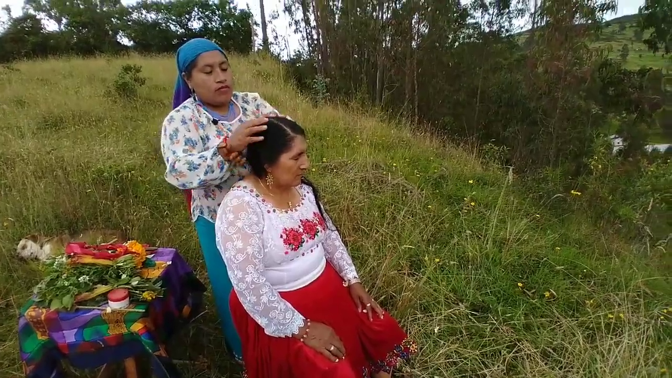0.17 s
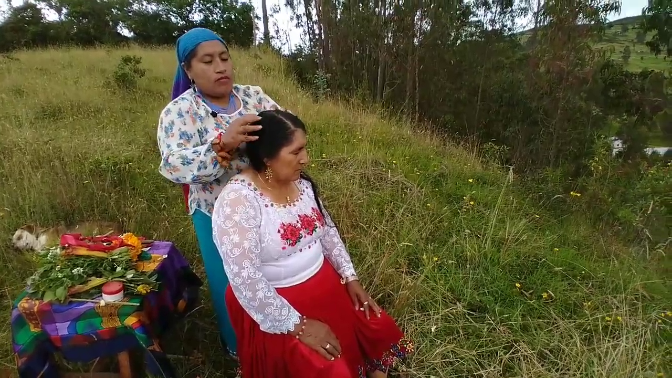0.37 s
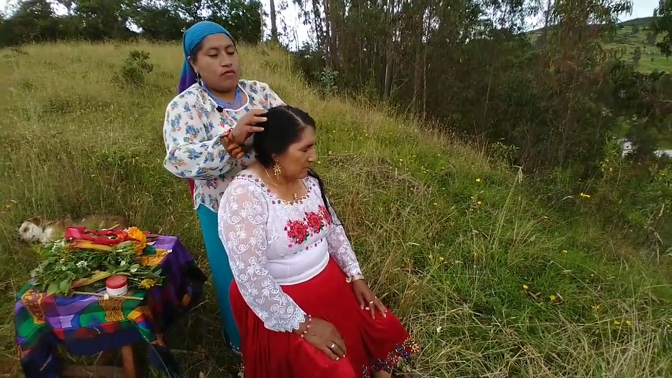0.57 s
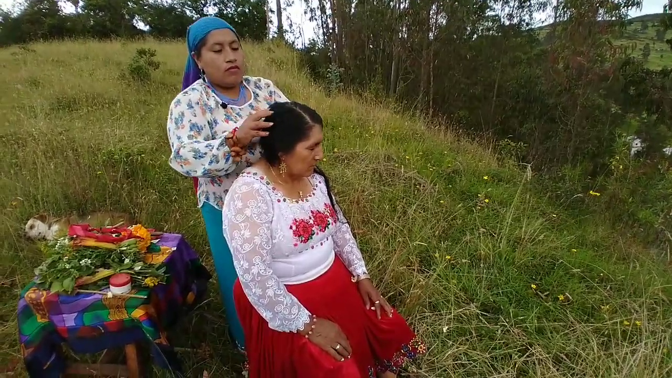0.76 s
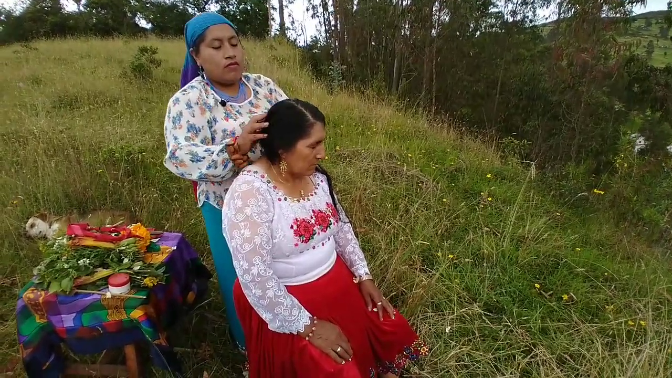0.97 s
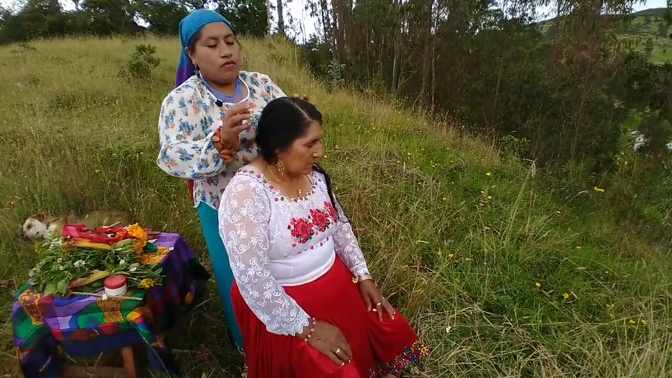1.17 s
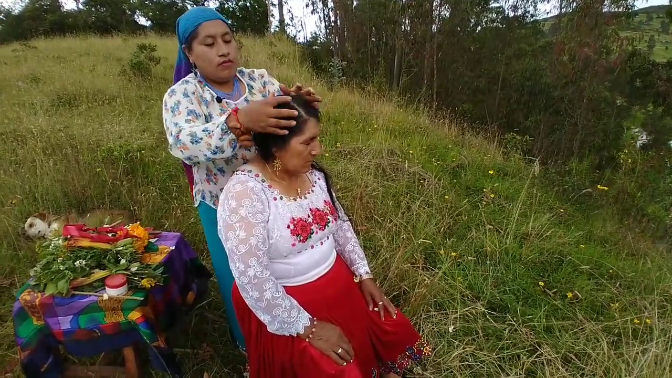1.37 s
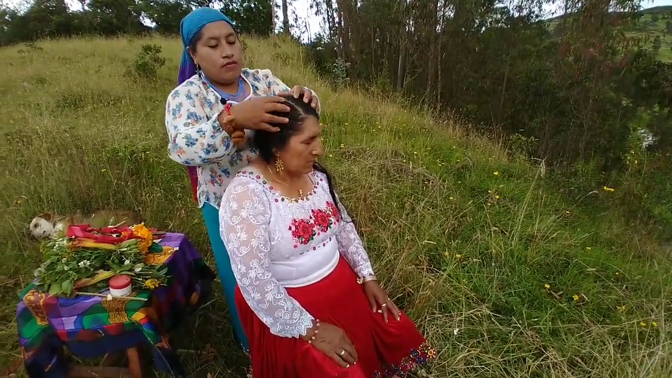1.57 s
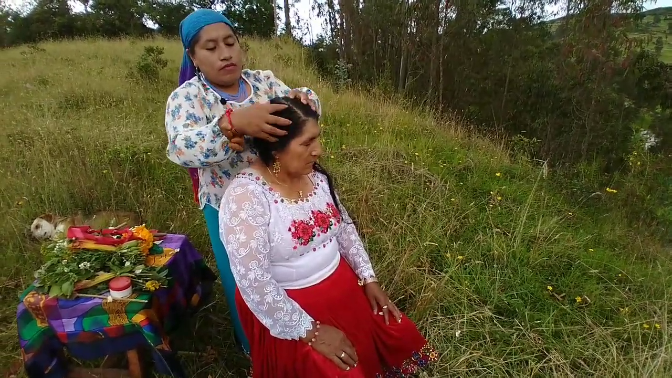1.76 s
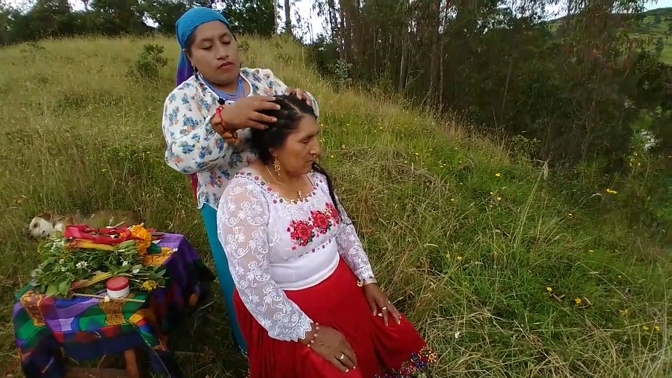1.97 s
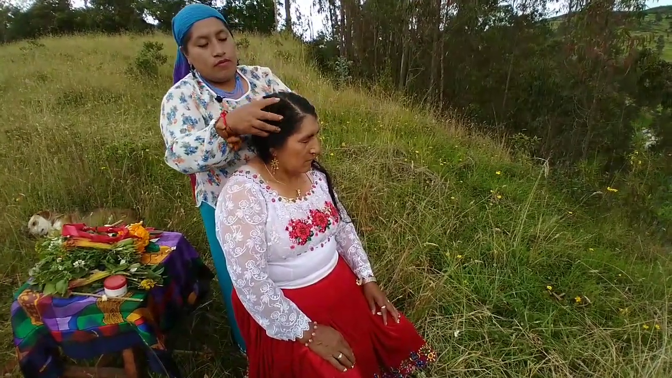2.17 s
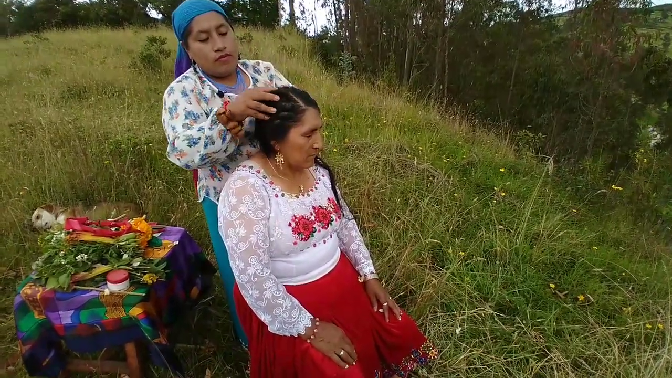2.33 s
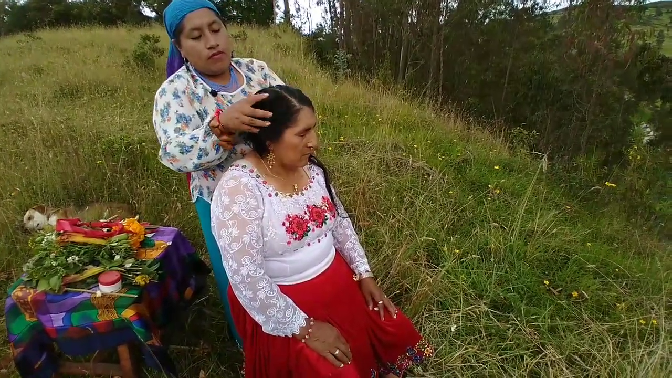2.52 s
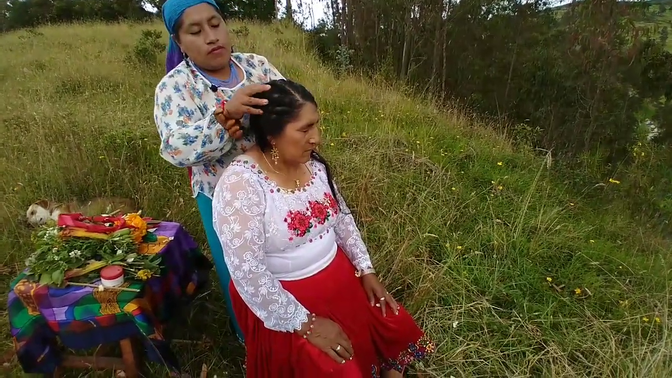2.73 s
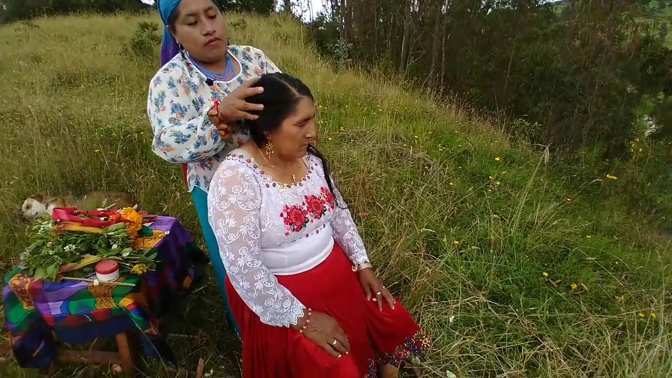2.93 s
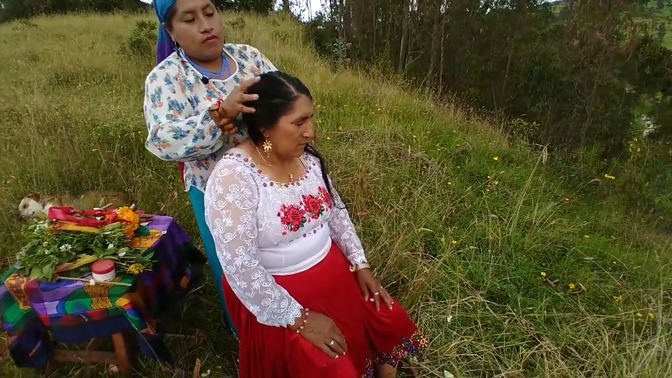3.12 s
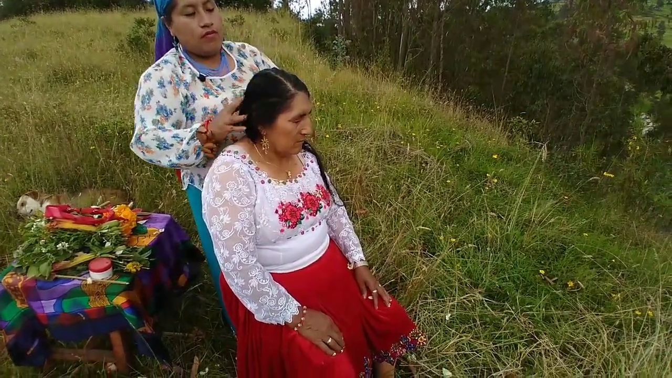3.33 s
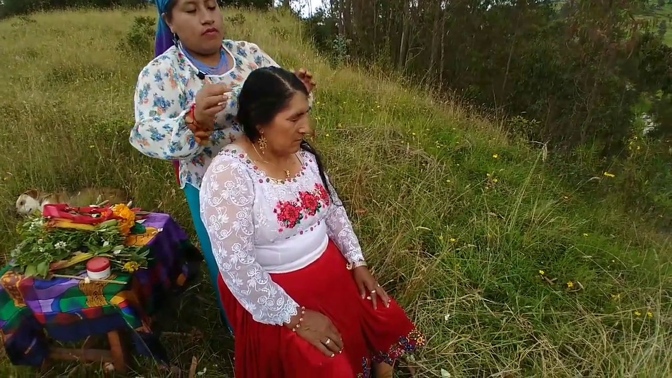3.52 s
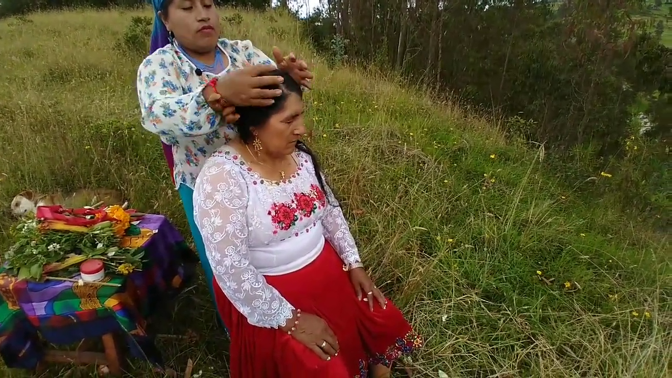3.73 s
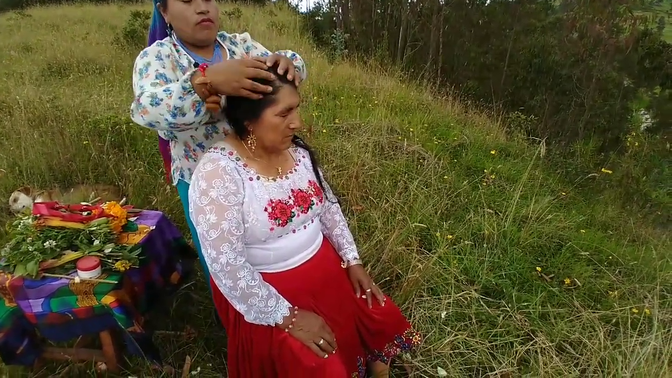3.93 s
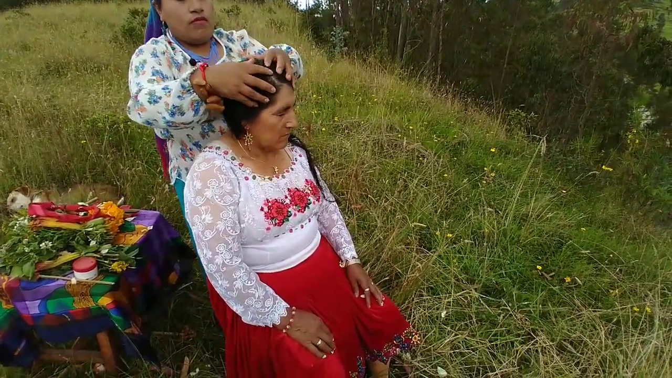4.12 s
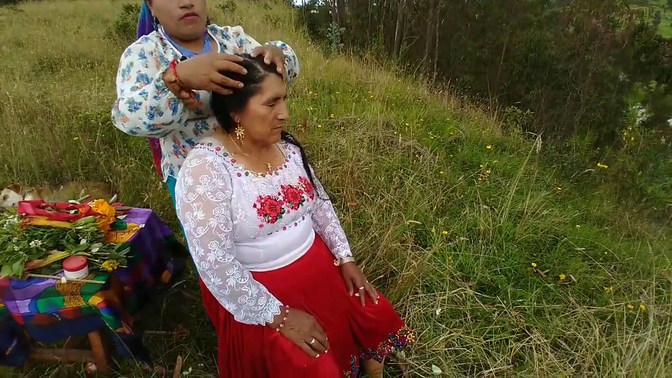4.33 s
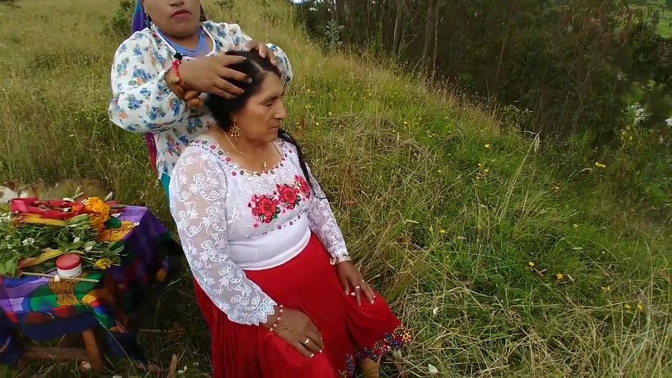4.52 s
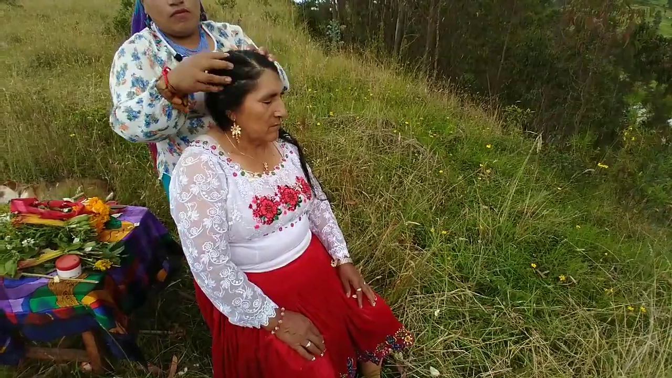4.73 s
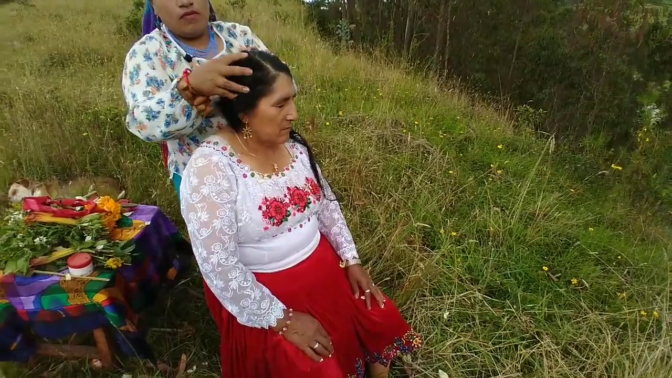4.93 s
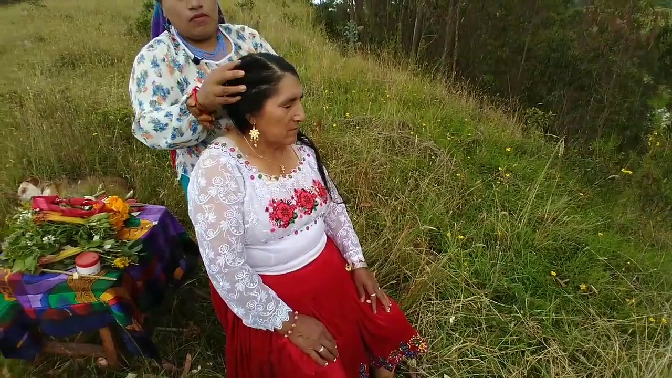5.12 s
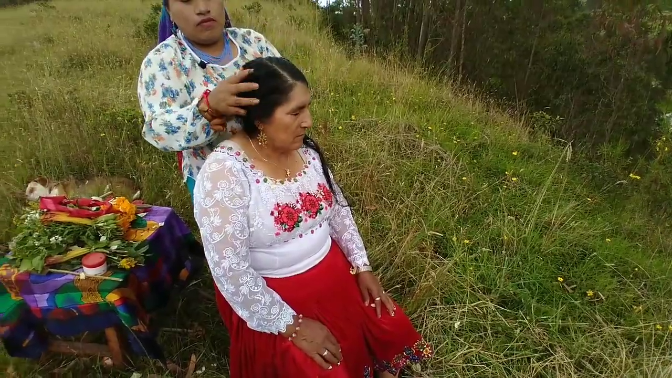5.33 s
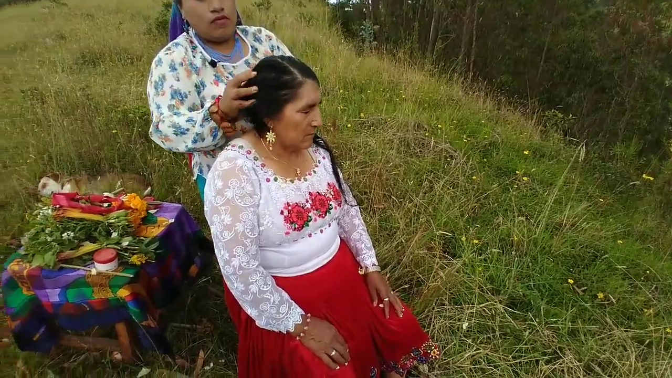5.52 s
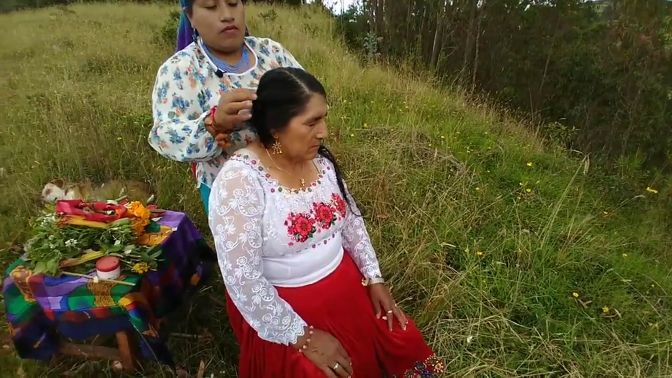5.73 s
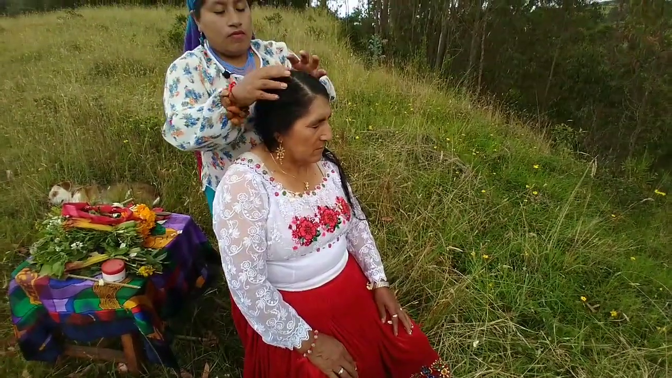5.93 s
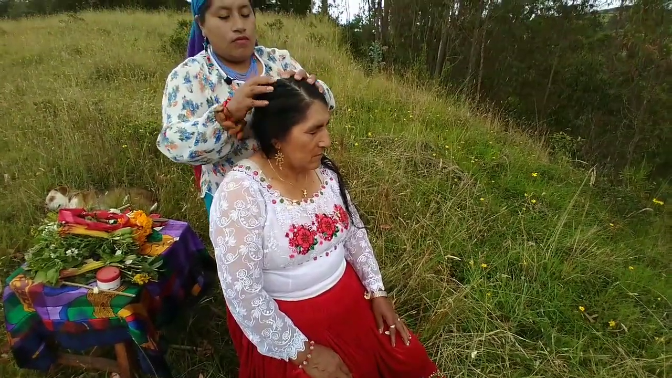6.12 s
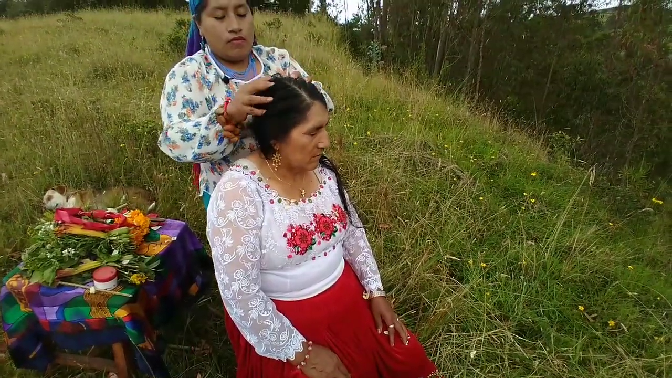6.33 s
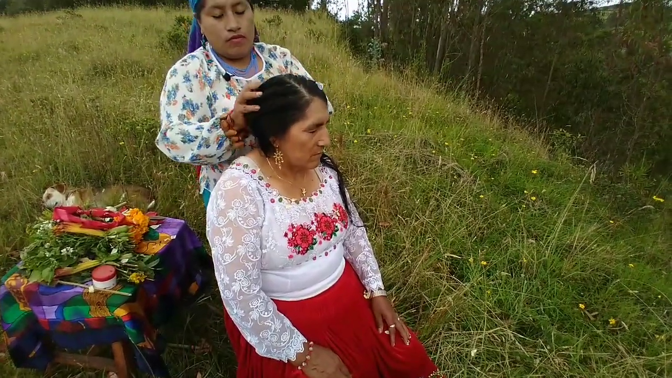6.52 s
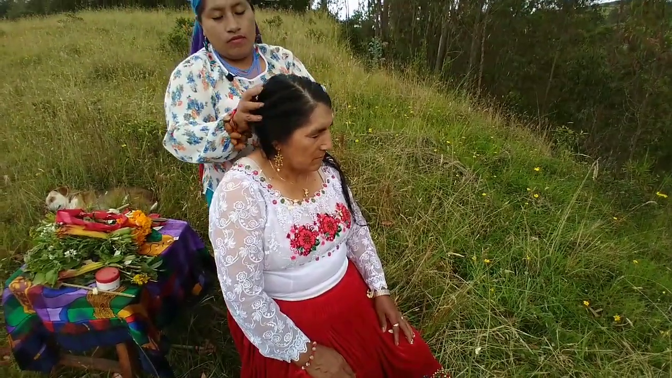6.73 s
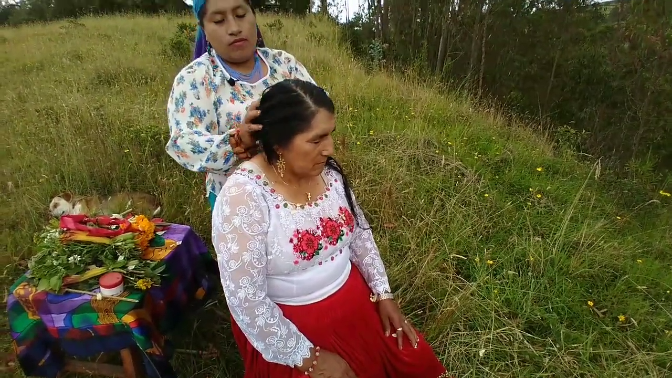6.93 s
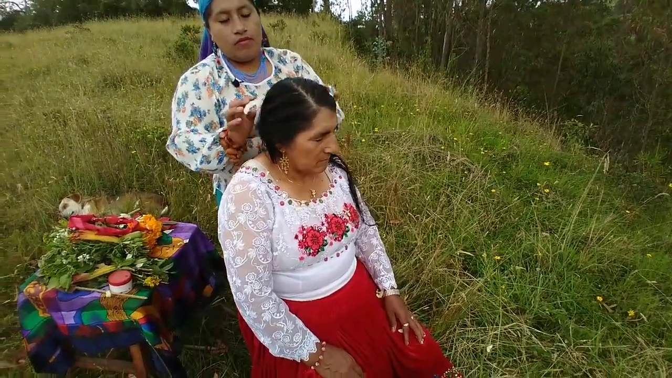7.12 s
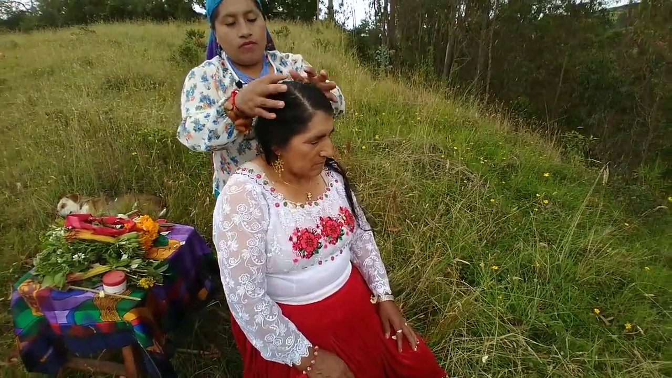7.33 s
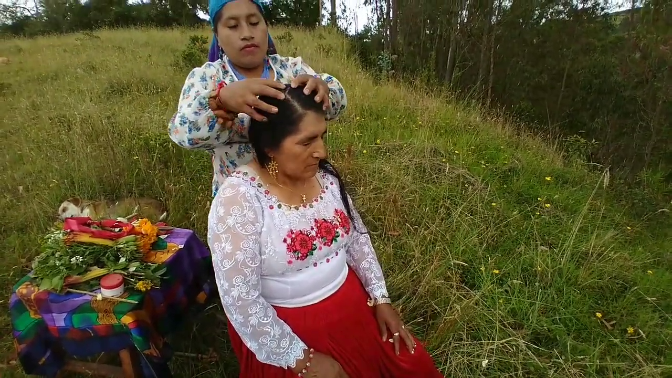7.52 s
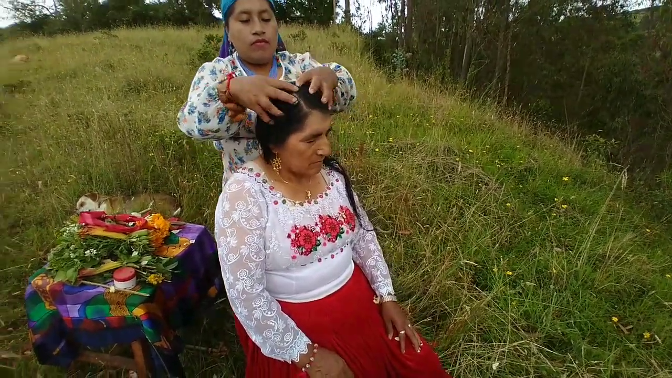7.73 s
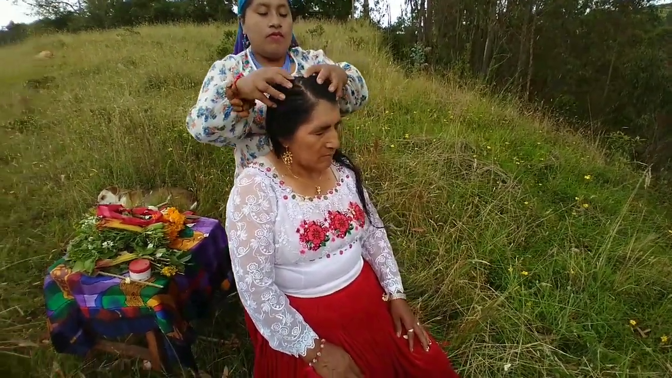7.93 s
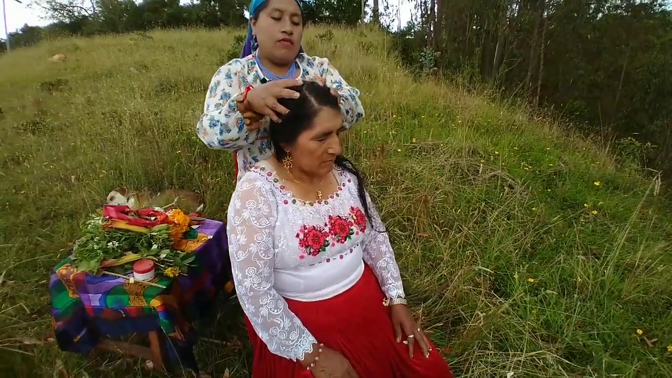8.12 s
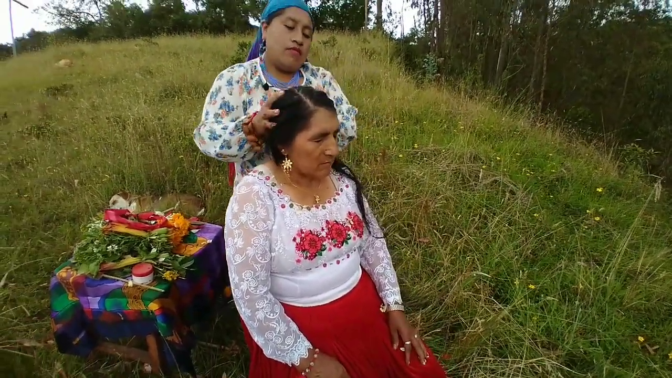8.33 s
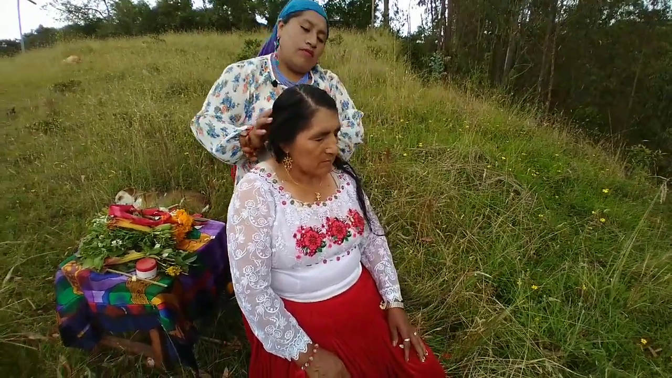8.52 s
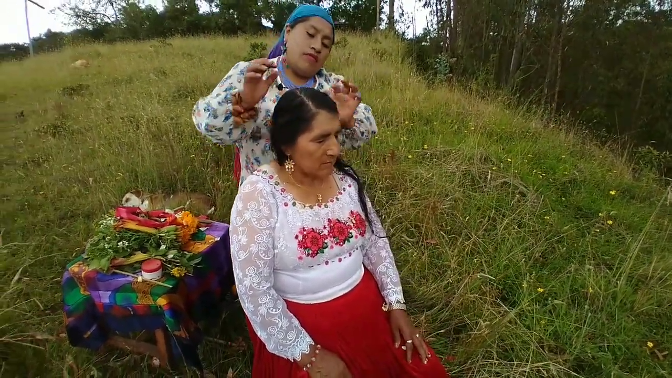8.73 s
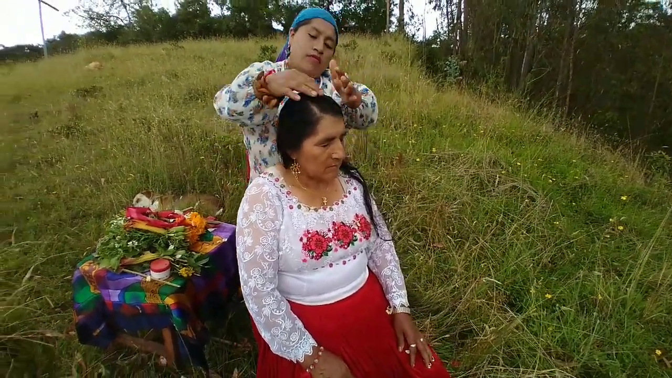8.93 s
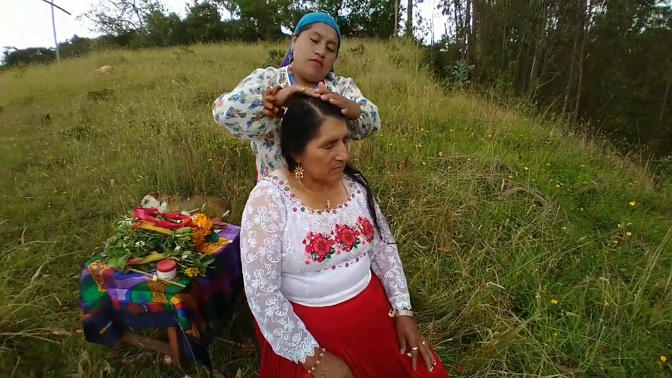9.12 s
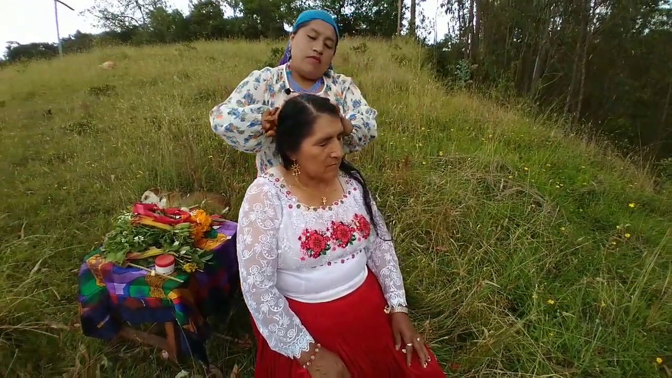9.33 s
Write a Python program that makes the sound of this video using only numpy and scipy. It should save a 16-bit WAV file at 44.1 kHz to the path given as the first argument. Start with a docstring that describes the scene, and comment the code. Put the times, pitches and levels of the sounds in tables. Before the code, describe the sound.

A scalp is scratched outdoors, heard very near and slightly to the right. Quick firm strokes crackle with many tiny ticks of slipping hair, joined by dry nail rasp and sharp snaps. Between them light brushing continues with only tiny gaps. Behind is quiet open air, deep rumble, faint hiss and a distant low hum, with no room echo.

```python
"""Fingers brush lightly through hair and scratch the scalp in firm strokes all along, on a quiet hillside.
Each stroke makes many hairs slip: random ticks ring in narrow bands and merge into a crackle.
Thin chirps of narrow noise, sharp snaps that ring, a dry rasp of nails and ticks of loose hairs join in.
Behind lie shaped noise as open air, a wavering sine as a far drone, and faint tones of narrow noise.
A small two-port microphone close by hears the hands with a slight delay on the left."""
import sys
import numpy as np
from scipy import signal
from scipy.fft import rfft, irfft
from scipy.io import wavfile
from scipy.ndimage import uniform_filter1d, map_coordinates

SR = 44100
rng = np.random.default_rng(int(sys.argv[2]) if len(sys.argv) > 2 else 0)


def pcm_store(signal):
    """Save signal as 16-bit PCM."""
    levels = np.round(np.clip(np.atleast_2d(signal), -1, 1) * 32767)
    wavfile.write(sys.argv[1], SR, levels.astype(np.int16).T)


N = 413658

# a finger digs in and scratches: (start t/s, length/s, relative level/dB, ring f/Hz)
SCRATCH_STROKES = [(0.19, 0.11, -22, 3190), (0.314, 0.067, -16, 3100), (0.517, 0.14, -27.5, 2950),
                   (0.697, 0.11, -22.5, 3070), (0.896, 0.122, -26, 2600), (1.052, 0.046, -19.5, 3080),
                   (1.402, 0.024, -31, 3080), (1.565, 0.15, -31, 3080), (1.878, 0.023, -30.5, 2760),
                   (1.94, 0.016, -28, 2610), (2.065, 0.023, -21.5, 3220), (2.208, 0.085, -31, 2880),
                   (2.369, 0.032, -31, 2830), (2.495, 0.0143, -36, 2580), (2.841, 0.057, -29.5, 3350),
                   (2.931, 0.048, -32, 2980), (3.146, 0.05, -30, 2900), (3.268, 0.075, -31.5, 2930),
                   (3.452, 0.13, -27.5, 2800), (3.786, 0.013, -33.5, 2670), (3.842, 0.093, -31, 2450),
                   (3.985, 0.039, -36.5, 3220), (4.216, 0.066, -31.5, 2320), (4.389, 0.046, -20.5, 3000),
                   (4.477, 0.14, -33, 3050), (4.662, 0.0099, -28.5, 2730), (4.729, 0.04, -27, 2960),
                   (4.773, 0.02, -17, 2950), (4.883, 0.048, -32.5, 2980), (5.091, 0.2, -32.5, 2550),
                   (5.581, 0.042, -28, 3160), (5.665, 0.014, -30, 2770), (5.809, 0.032, -23, 2920),
                   (6.07, 0.071, -17.5, 3000), (6.169, 0.062, -22.5, 3400), (6.21, 0.052, -16, 3150),
                   (6.291, 0.01, -21, 2720), (6.408, 0.032, -28.5, 3000), (6.459, 0.069, -25.5, 2700),
                   (6.58, 0.11, -24, 2830), (6.862, 0.15, -29.5, 2730), (7.044, 0.03, -21, 2540),
                   (7.13, 0.039, -20.5, 3300), (7.215, 0.054, -32, 2520), (7.401, 0.044, -32.5, 2900),
                   (7.593, 0.06, -18.5, 3200), (7.776, 0.035, -32, 2650), (7.857, 0.036, -26.5, 2520),
                   (7.957, 0.08, -24.5, 3150), (8.126, 0.056, -30, 3100), (8.263, 0.067, -30.5, 2630),
                   (8.363, 0.058, -28.5, 2520), (8.537, 0.076, -30.5, 2450), (8.681, 0.059, -30.5, 2570),
                   (8.927, 0.0088, -26, 2400), (8.952, 0.066, -17, 2760), (9.064, 0.099, -20, 3180),
                   (9.137, 0.16, -31.5, 2900)]
# the hands brush lightly through the hair: (start t/s, end t/s, relative level/dB)
BRUSH_PASSES = [(0, 1.151, -37), (1.381, 2.502, -41.5), (2.648, 3.046, -44), (3.157, 3.71, -39.5),
                (3.759, 4.976, -44), (5.012, 5.335, -42.5), (5.536, 6.303, -40.5), (6.389, 7.282, -38),
                (7.387, 8.057, -43), (8.103, 9.303, -41.5)]
# a nail lets go of a strand: (t/s, relative peak level/dB, ring f/Hz)
STRAND_SNAPS = [(0.3085, -8, 2760), (0.3244, -3.5, 3020), (0.575, -14.5, 3220), (0.7081, -4, 3050),
                (0.7863, 0.5, 3020), (0.9307, -4.5, 2580), (1.601, -5, 3700), (2.042, -17, 3440),
                (2.0713, -4, 3220), (3.437, -19, 2820), (3.506, -19, 2850), (3.8867, -12.5, 3100),
                (3.9285, -13, 3000), (4.386, -8.5, 3300), (5.1545, -13.5, 3240), (5.2436, -9, 3180),
                (5.81, -11.5, 3350), (6.0639, -12.5, 4160), (6.1874, -3.5, 4080), (6.233, 0.5, 3070),
                (6.4648, -9.5, 2580), (6.6439, -2.5, 3000), (7.6018, -41, 3080), (7.632, -8.5, 3510),
                (8.1534, -11, 3000), (8.3834, -15, 2490), (8.9977, -2.5, 2970), (9.0774, -7.5, 3300),
                (9.0941, -0.5, 3000), (9.128, -4, 3100), (9.2591, -12.5, 2630)]
# thin high chirps, short narrow bands of noise with a sharp start: (start t/s, relative level/dB, pitch f/Hz)
THIN_CHIRPS = [(1.496, -26, 3910), (1.599, -30, 3530), (1.83, -31, 3700), (2.04, -22.5, 3550),
               (2.244, -26, 3900), (3.845, -34, 3800), (4.116, -34.5, 3780), (4.538, -29, 3730),
               (4.583, -25, 3700), (6.02, -23.5, 3940), (6.185, -18, 3980), (6.567, -26.5, 4160),
               (6.886, -25, 4020), (8.958, -15, 3940)]
# tone colour of scratched hair: (f/Hz, relative level/dB)
HAIR_COLOUR = [(700, -25), (1400, -16.5), (1660, -5.5), (1830, -14), (2070, -6.5), (2750, 0.5),
               (3150, -7.5), (3450, -7.5), (3850, -11.5), (4500, -13), (5400, -21), (7000, -20.5),
               (9500, -30), (11500, -44.5), (15500, -70)]
# direction of the hands: (t/s, mean delay of the left port/s)
HAND_BEARING = [(0, 0.00018), (2.2, 0.00018), (3.6, 0.0002), (4.7, 0.00024), (6.0, 0.00018), (8.0, 0.00017),
                (9.4, 0.00012)]
# spectrum of outdoor rumble and hiss: (f/Hz, level/dB per Hz)
AIR_SPECTRUM = [(12, -47.5), (25, -58), (50, -61), (100, -63), (150, -69.5), (300, -73.5), (600, -81.5),
                (900, -84.5), (1300, -95), (1800, -103), (2800, -101), (5000, -108), (9000, -112),
                (15000, -114)]
# how alike the air is at both ports: (f/Hz, likeness from 0 to 1)
AIR_PORT_LIKENESS = [(25, 0), (60, 0.5), (200, 0.61), (450, 0.47), (900, 0), (8000, 0.27)]
# path of the far drone, before its random waver: (t/s, pitch f/Hz, peak level/dB)
DRONE_PATH = [(0, 101, -44.5), (1.7, 103, -48), (3.8, 94, -45.5), (4.3, 77, -53.5), (6.5, 76, -48.5),
              (9.38, 85, -46.5)]
# faint tones from far away: (middle t/s, length/s, level/dB, pitch f/Hz)
DISTANT_TONES = [(0.03, 0.12, -55.5, 972), (0.3, 0.68, -56.5, 825), (1.58, 0.19, -43.5, 162.3),
                 (2.2, 0.25, -58.5, 853), (4.26, 0.1, -54, 720), (4.7, 0.37, -60, 877),
                 (6.98, 0.17, -57.5, 897)]

ATTACK_S, RELEASE_S = 0.0052, 0.01   # how fast a finger bites and lets go
ARCH_DB = 2   # a stroke presses this much harder midway than at its ends
TOUCHES_PER_S, TOUCH_S, TOUCH_SPREAD_DB = 24, 0.018, 4   # fingertips catch briefly
GLIDE_DB = -7.0   # the steady rub beneath those touches
CHIRP_S = 0.018   # a chirp's strength falls to 1/e in this time
CUTOFF_HZ = 15600


def hand(brush_hz=2700):
    """Firm strokes add to the light brushing; the strongest contact weighs most in the ring pitch."""
    power = brushing() ** 2 + 1e-12
    weighted_hz = power * brush_hz
    for start, length, db, hz in SCRATCH_STROKES:
        press = contact(length)
        progress = np.minimum(np.arange(len(press)) / SR / length, 1)
        arch = np.sin(np.pi * progress)
        stroke_power = (press * from_db(db + ARCH_DB * (arch - 1))) ** 2
        add(power, stroke_power, start)
        add(weighted_hz, stroke_power * hz, start)
    return np.sqrt(power), weighted_hz / power


def contact(length):
    """A finger's pressure rises, holds until this many seconds after the start, then dies away."""
    t = np.arange(int((length + 10 * RELEASE_S) * SR)) / SR
    attack = np.minimum(t / ATTACK_S, 1)
    release = np.exp(-np.maximum(t - length, 0) / RELEASE_S)
    return attack * release


def brushing():
    """Fingertips glide and catch lightly for as long as the hands are in the hair."""
    in_hair, touches = np.zeros(N), np.zeros(N)
    for start, end, db in BRUSH_PASSES:
        add(in_hair, from_db(db) * contact(end - start), start)
    # each touch strays from an even beat and has its own strength
    for k, (late, strength) in enumerate(rng.uniform(-1, 1, size=(600, 2))):
        touch = from_db(TOUCH_SPREAD_DB * strength) * contact(TOUCH_S)
        add(touches, touch, (k + late / 2) / TOUCHES_PER_S)
    return in_hair * rms_one(from_db(GLIDE_DB) + touches)


def jerks(level_db=-1.0, size=1800):
    """The finger sticks and jerks on, which shares its force out unevenly within a stroke."""
    force = tufts(per_s=170, settle_s=0.0028, steady=1.0)
    # keep the power even over about 41 ms
    nearby_power = uniform_filter1d(force ** 2, size=size)
    return from_db(level_db) * force / np.sqrt(nearby_power + 1e-9)


def slips(per_s, spread_db):
    """Hairs slip free at random moments, with random sizes and directions; rms 1."""
    born = rng.random(N) < per_s / SR
    size_db = spread_db * np.minimum(rng.exponential(1, N), 3)
    return rms_one(born * from_db(size_db) * rng.choice([-1, 1], N))


def tufts(per_s=90, settle_s=.003, steady=.5):
    """Hairs give way in tufts: a sudden flurry that dies in a few milliseconds; rms 1."""
    starts = (rng.random(N) < per_s / SR) + 1e-18
    flurries = signal.lfilter([1], [1, -np.exp(-1 / (settle_s * SR))], starts)
    return rms_one(steady + rms_one(flurries))


def crackle(pressure, ring_hz, wander_octaves=0.16, slips_per_s=260, spread_db=2.5, level_db=-2.0, count=14):
    """Slipping strands ring briefly in many narrow bands; a firm stroke stirs a wider range of pitches."""
    centre_hz = ring_hz * 2 ** (wander_octaves * drift(35, N))
    reach_octaves = 0.3 + 0.22 * (pressure / pressure.max()) ** 0.16
    flurry = tufts(per_s=80, settle_s=.003, steady=.6)
    strands = np.zeros(N)
    for hz in np.geomspace(1600, 4300, count):
        octaves_away = np.log2(hz / centre_hz)
        near = np.exp(-.5 * (octaves_away / reach_octaves) ** 2)
        caught = from_db(4.16 * drift(45, N))
        ticks = slips(slips_per_s, spread_db) * near * caught * flurry
        strands += resonance(ticks, hz, width_hz=139)
    sound = through_hair(strands)
    # the finger's pressure, not the number of strands caught, sets the power
    power = np.maximum(uniform_filter1d(sound ** 2, size=700), 0)
    evened = sound / np.sqrt(power + 0.05 * np.mean(sound ** 2))
    return from_db(level_db) * pressure * evened


def snaps(burst_s=0.00061, settle_s=0.0037, tail_db=-15, ring_db=9, level_db=0.0, size=1024):
    """A caught strand lets go: a sharp burst of slips that rings, then its neighbours settle."""
    out, t = np.zeros(N), np.arange(size) / SR
    release = np.exp(-t / burst_s) + from_db(tail_db) * np.exp(-t / settle_s)
    for s, db, hz in STRAND_SNAPS:
        burst = through_hair(rng.standard_normal(size) * release)
        sound = burst + from_db(ring_db) * resonance(burst, hz, width_hz=560)
        sound = sound / np.abs(sound).max()
        # start just ahead of the listed time
        add(out, from_db(db + level_db) * sound, s - .0002)
    return out


def chirps(level_db=-6.0, size=4096, width_hz=380):
    """Thin high chirps: short narrow bands of noise with a sharp start and a smooth fade."""
    out = np.zeros(N)
    fade = np.exp(-(np.arange(size) / SR / CHIRP_S) ** 2)
    for start, db, hz in THIN_CHIRPS:
        noise = rng.standard_normal(size) * fade
        sound = resonance(resonance(noise, hz, width_hz), hz, width_hz)
        sound = rms_one(sound) * np.sqrt(np.mean(fade ** 2))
        add(out, from_db(db + level_db) * sound, start)
    return out


def rasp(pressure, slips_per_s=1400, spread_db=2.5, rub_db=-14, level_db=-11.5):
    """Dry unpitched ticks of nail on hair, over the smooth rub of skin; tilted towards the treble."""
    rub = from_db(rub_db) * rng.standard_normal(N)
    ticks = slips(slips_per_s, spread_db) + rub
    ticks = rms_one(ticks * tufts(per_s=90, settle_s=0.0027, steady=0.87))
    # a hair holds only so much force before it slips
    ticks = through_hair(np.tanh(ticks / 14))
    bright = signal.sosfilt(signal.butter(1, 3500, "high", fs=SR, output="sos"), ticks)
    return from_db(level_db) * pressure * rms_one(bright)


def strays(level_db=-64):
    """Loose hairs keep springing back with light ticks, also between the strokes."""
    ticks = np.zeros(N)
    for hz in (2150, 2700, 3700):
        ticks += resonance(slips(per_s=18, spread_db=-15), hz, width_hz=730)
    return from_db(level_db) * rms_one(through_hair(ticks))


def through_hair(sound):
    """Every slip takes the colour of the hair."""
    return signal.oaconvolve(sound, click_response(HAIR_COLOUR))[:len(sound)]


def ports(x, pan_db=-0.14, size=512):
    """The sound reaches the left port late, by a wandering delay, with different treble echoes per port."""
    s, delay_s = np.transpose(HAND_BEARING)
    delay_s = np.interp(np.arange(N) / SR, s, delay_s) + .000023 * drift(60, N)
    left = map_coordinates(x, [np.arange(N) - delay_s * SR], order=3)
    # hands and head scatter the treble differently into each port
    echoes = rng.standard_normal((2, size)) * np.exp(-np.arange(size) / SR / .002)
    echoes = echoes / np.linalg.norm(echoes, axis=1, keepdims=True)
    echoes = 0.73 * signal.sosfilt(signal.butter(2, 4700, "high", fs=SR, output="sos"), echoes)
    scattered = signal.oaconvolve(x[None], echoes, axes=1)[:, :N]
    return (np.array([left, x]) + scattered) * from_db([[-pan_db], [pan_db]])


def air():
    """Open air: a steady rumble that falls away to a faint hiss, partly shared by the two ports."""
    hz = np.fft.rfftfreq(N, 1 / SR)
    alike = np.clip(at_hz(AIR_PORT_LIKENESS, hz), -1, 1)
    mid, side = rfft(rng.standard_normal((2, N)))
    shared = np.sqrt(1 + alike) * mid
    opposed = np.sqrt(1 - alike) * side * [[1], [-1]]
    shaped = (shared + opposed) * from_db(at_hz(AIR_SPECTRUM, hz))
    return irfft(shaped, N) * np.sqrt(SR) / 2


def drone(waver=0.0253, fade_db=4.0):
    """A far engine: one sine whose pitch wavers and whose level fades in and out by chance."""
    s, path_hz, path_db = np.transpose(DRONE_PATH)
    t = np.arange(N) / SR
    hz, db = np.interp(t, s, path_hz), np.interp(t, s, path_db)
    phase = 2 * np.pi * np.cumsum(hz * (1 + waver * drift(11, N))) / SR
    return from_db(db + fade_db * drift(7.4, N)) * np.sin(phase)


def narrow_tones(rows, width_share, size):
    """Each row swells and fades as noise held in a narrow band, set as a share of its pitch."""
    out = np.zeros(N)
    for middle, length, db, hz in rows:
        envelope, width_hz = swell(length, size), width_share * hz
        noise = rng.standard_normal(size)
        sound = resonance(resonance(noise, hz, width_hz), hz, width_hz) * envelope
        sound = rms_one(sound) * np.sqrt(np.mean(envelope ** 2))
        add(out, from_db(db) * sound, middle - size / 2 / SR)
    return out


def swell(length, size):
    """A smooth bell-shaped rise and fall around the middle."""
    return np.exp(-2 * ((np.arange(size) - size / 2) / SR / length) ** 2)


def resonance(x, hz, width_hz):
    """Two-pole resonance with gain 1 on top: it rings longer the narrower it is."""
    r = np.exp(-np.pi * width_hz / SR)
    feed = np.array([1, 0, -1]) * (1 - r * r) / 2
    return signal.lfilter(feed, [1, -2 * r * np.cos(2 * np.pi * hz / SR), r * r], x)


def click_response(spectrum, size=1024):
    """The ring with this spectrum that puts its energy as early as possible (minimum phase)."""
    gain = from_db(at_hz(spectrum, np.fft.rfftfreq(size, 1 / SR)))
    cepstrum = irfft(np.log(gain))
    # fold the backward half onto the forward half, so nothing sounds before the click
    cepstrum[1:size // 2] *= 2
    cepstrum[size // 2 + 1:] = 0
    return irfft(np.exp(rfft(cepstrum)))[:size // 2]


def drift(rate, size):
    """Slow chance of spread about 1, gliding to a new value rate times a second."""
    values = rng.standard_normal(size // 8)
    return np.interp(np.arange(size) * rate / SR, np.arange(size // 8), values)


def from_db(db):
    """Turn decibels into a plain gain."""
    return 10 ** (np.asarray(db) / 20)


def rms_one(x):
    """Scale a sound to an average strength (rms) of 1."""
    return x / np.sqrt(np.mean(x ** 2) + 1e-20)


def at_hz(points, hz):
    """Read a table of values at any frequency, along a logarithmic pitch scale."""
    table_hz, values = np.transpose(points)
    return np.interp(np.log(hz + 1e-3), np.log(table_hz), values)


def add(out, sound, s):
    """Mix a sound in from time s, dropping what falls outside."""
    start = round(s * SR)
    first, last = max(start, 0), min(start + len(sound), N)
    if last > first:
        out[first:last] += sound[first - start:last - start]


def scene():
    """Three groups of hair sounds reach the ports, each with its own wander, in the open air."""
    pressure, ring_hz = hand()
    pressure = pressure * jerks()
    scratching = ports(crackle(pressure, ring_hz) + chirps())
    scratching = scratching + ports(rasp(pressure) + strays()) + ports(snaps())
    # hair is too fine to radiate low notes
    scratching = signal.sosfilt(signal.butter(3, 1650, "high", fs=SR, output="sos"), scratching)
    # and the scratching loses its highest treble
    scratching = signal.sosfilt(signal.butter(4, 11800, "low", fs=SR, output="sos"), scratching)
    # one soft bump: middle t/s, length/s, level/dB, f/Hz
    soft_bump = narrow_tones([(6.617, 0.0037, -40, 554)], width_share=0.29, size=2048)
    far_tones = narrow_tones(DISTANT_TONES, width_share=0.072, size=65536)
    return scratching + soft_bump + air() + drone() + far_tones


def record(dry):
    """Any peaks beyond full scale clip, then a steep filter cuts the top."""
    clipped = np.clip(dry, -1, 1)
    return signal.sosfilt(signal.ellip(10, .1, 70, CUTOFF_HZ, fs=SR, output="sos"), clipped)


dry = scene()
out = record(dry)
pcm_store(out)
```